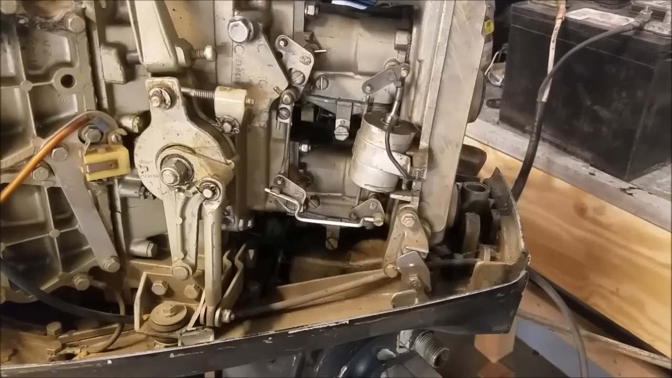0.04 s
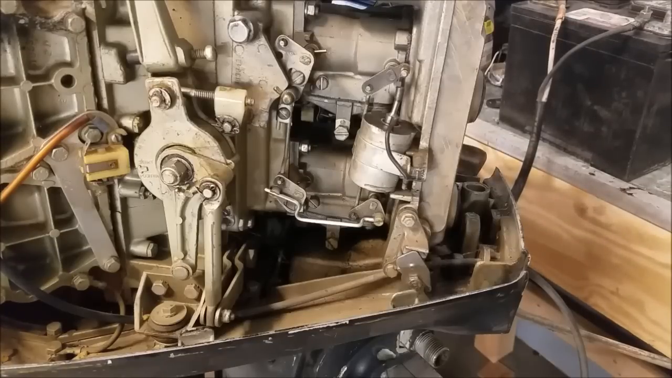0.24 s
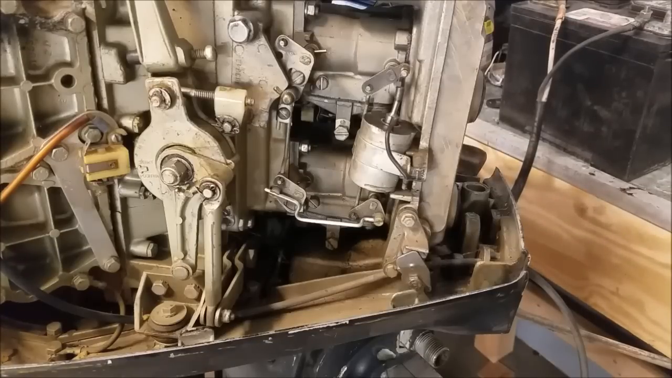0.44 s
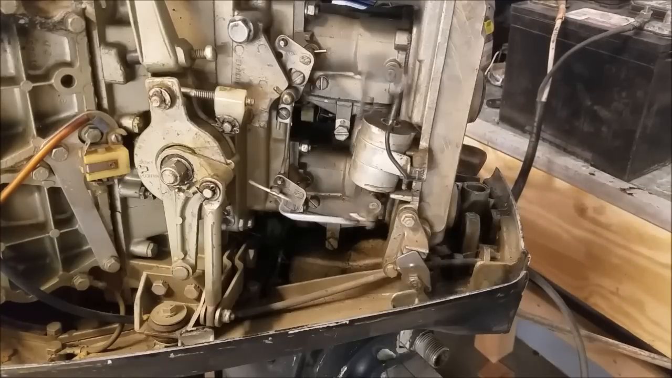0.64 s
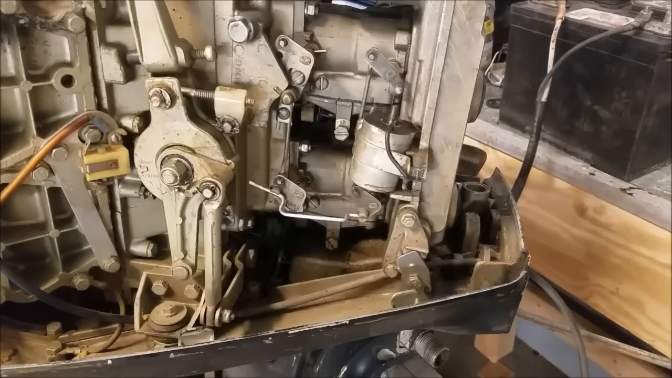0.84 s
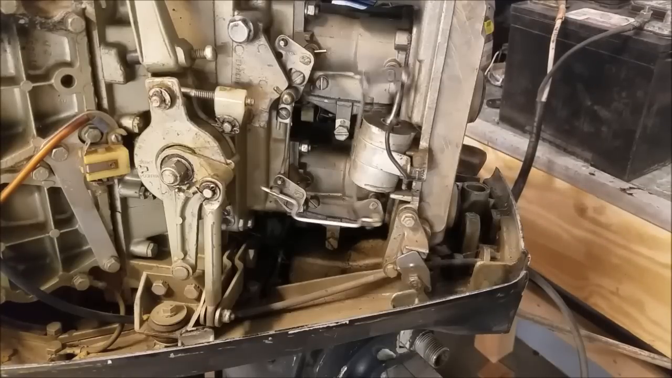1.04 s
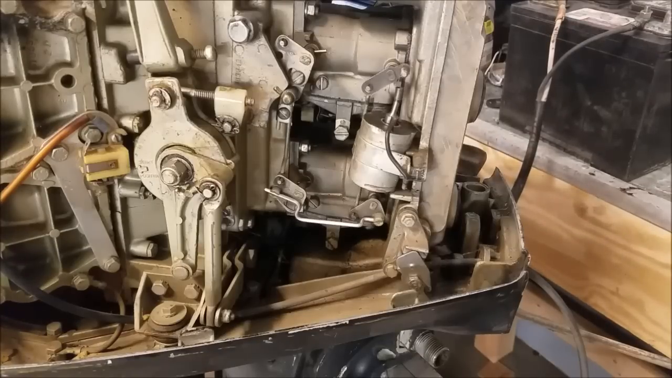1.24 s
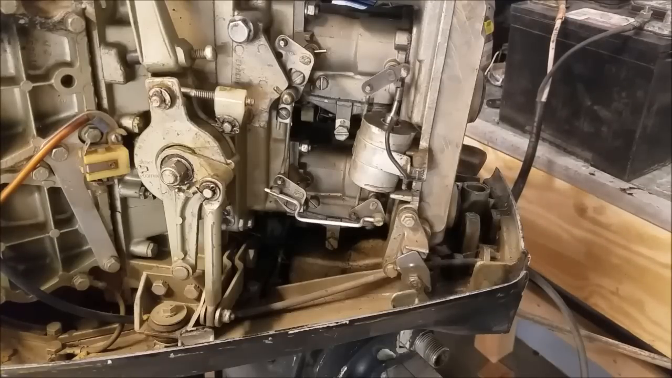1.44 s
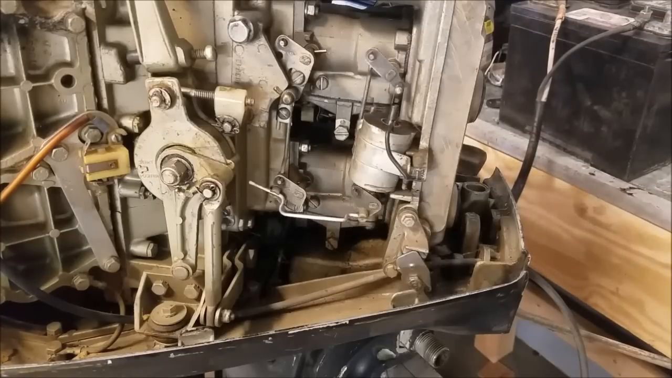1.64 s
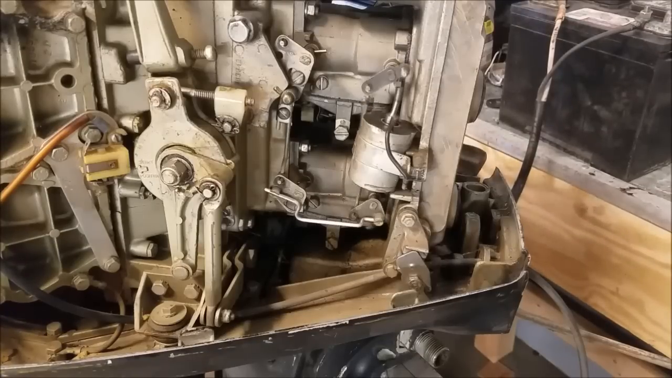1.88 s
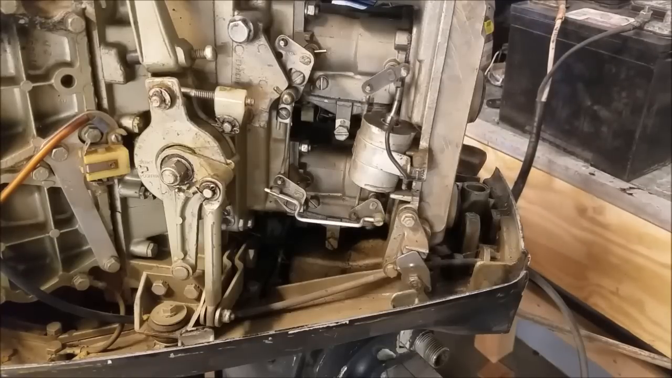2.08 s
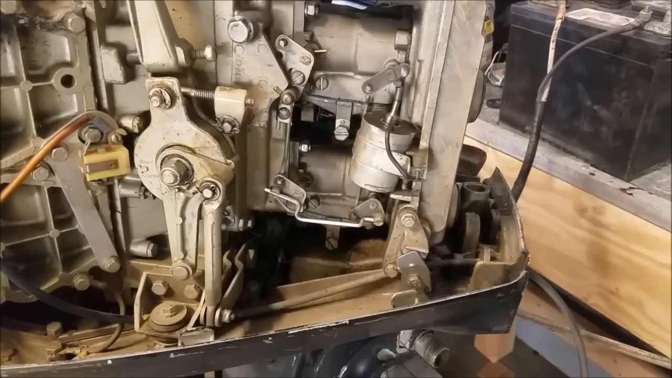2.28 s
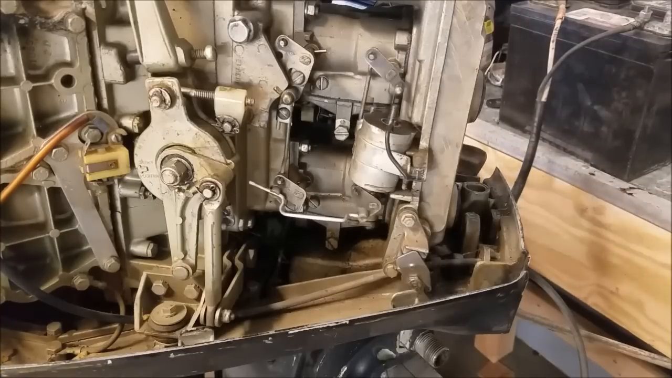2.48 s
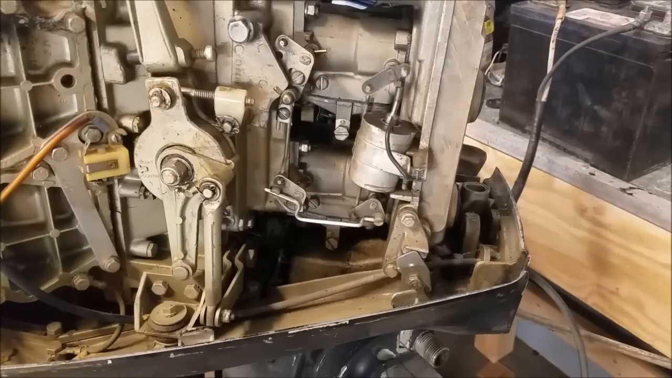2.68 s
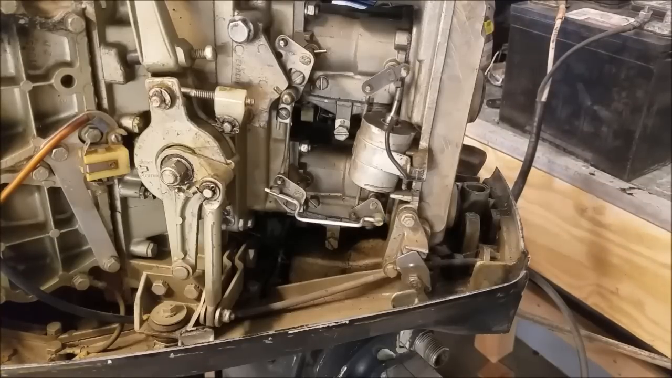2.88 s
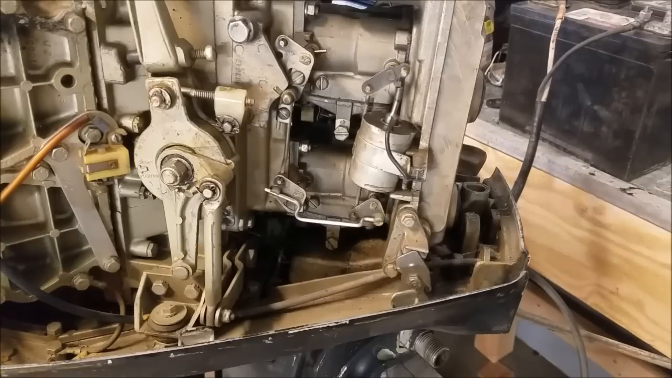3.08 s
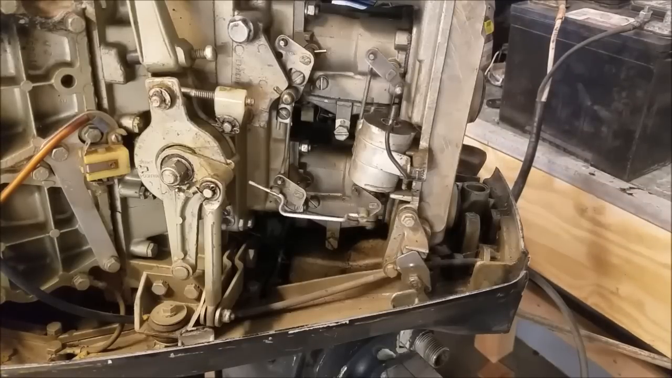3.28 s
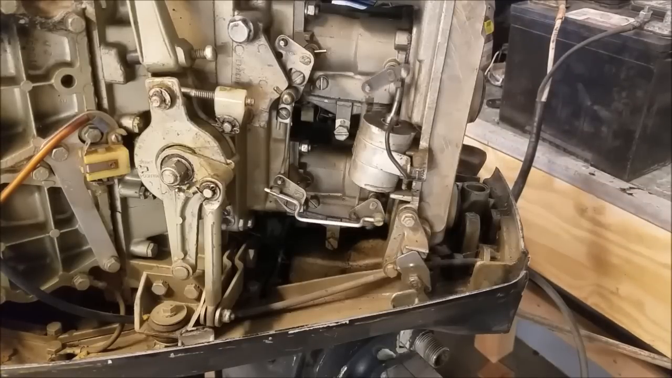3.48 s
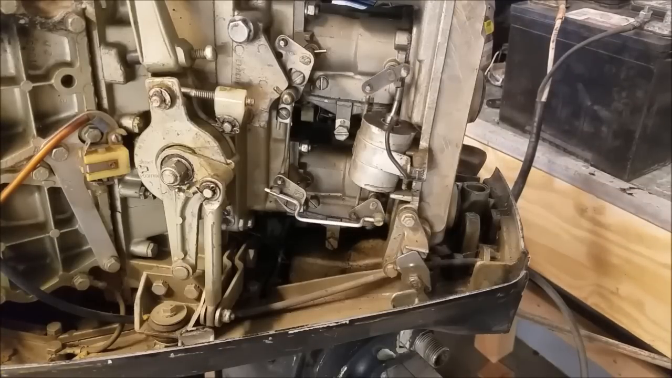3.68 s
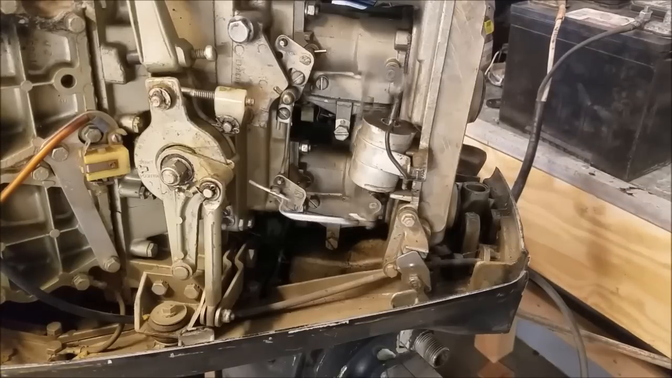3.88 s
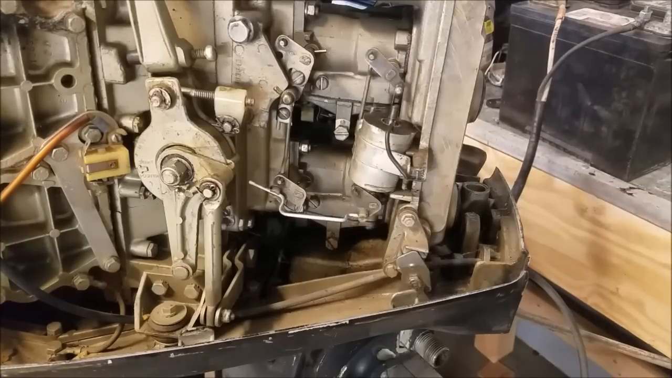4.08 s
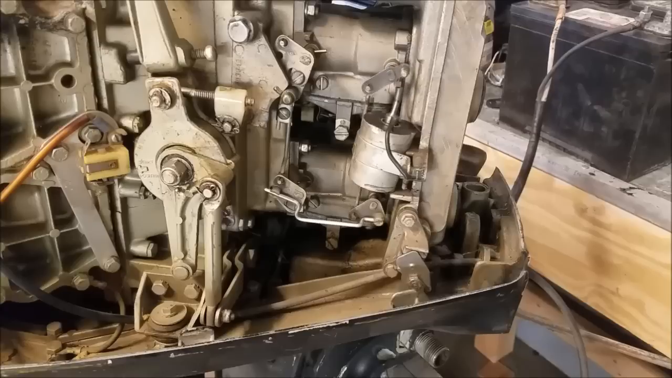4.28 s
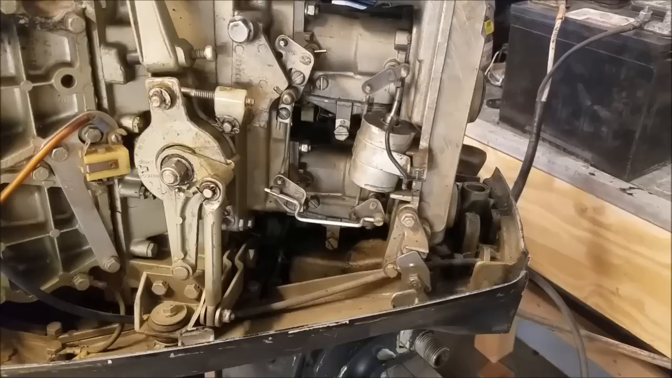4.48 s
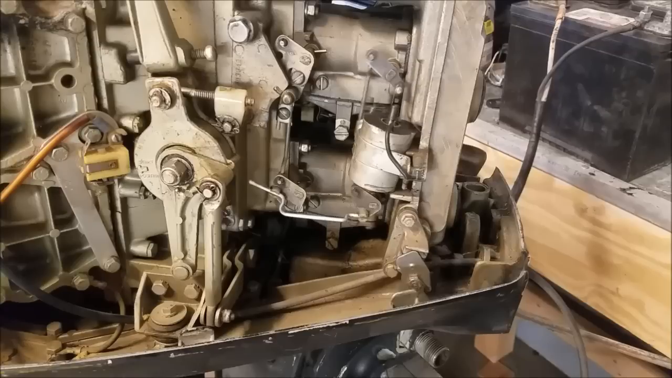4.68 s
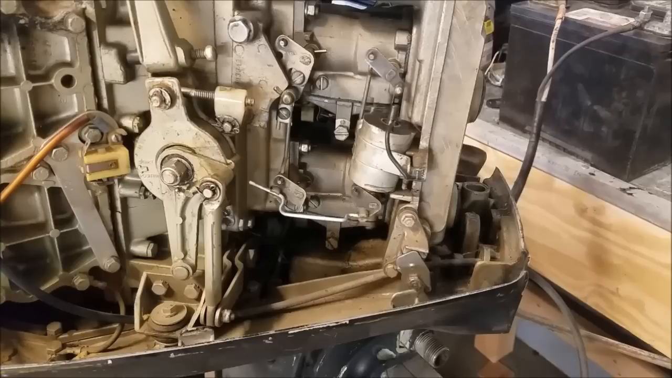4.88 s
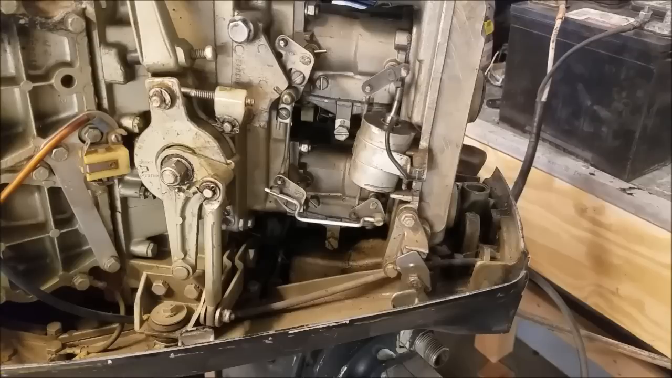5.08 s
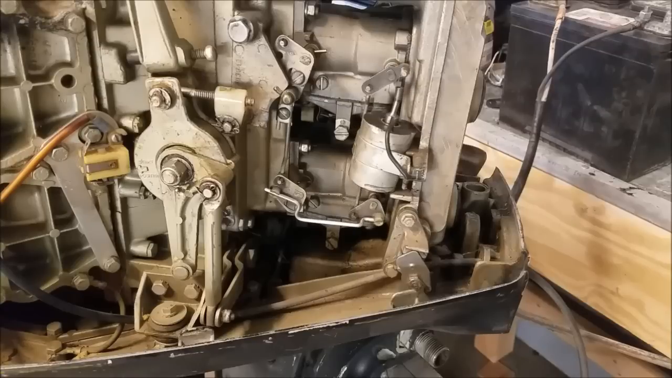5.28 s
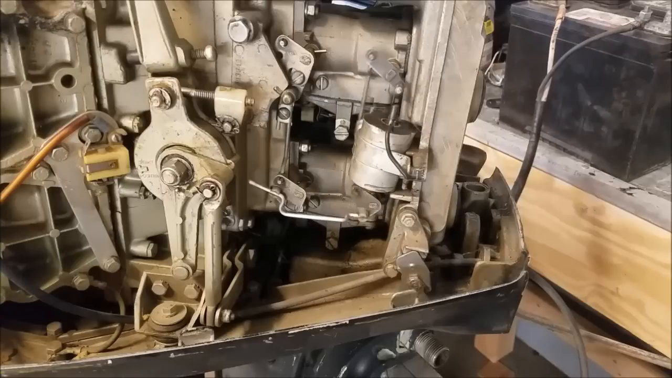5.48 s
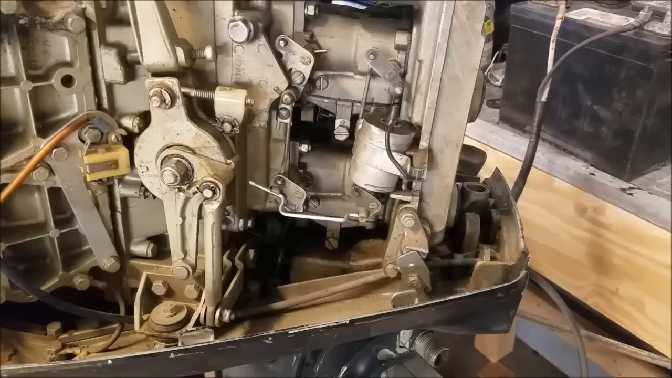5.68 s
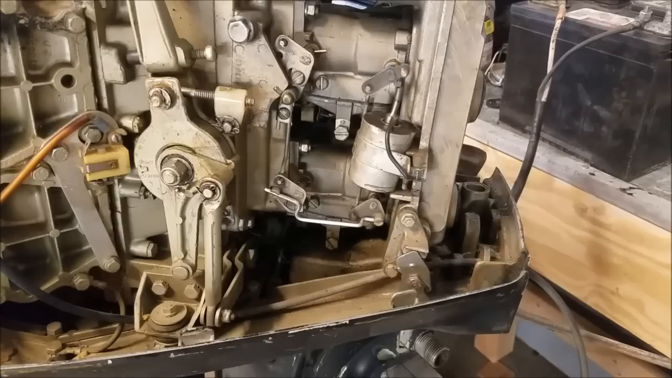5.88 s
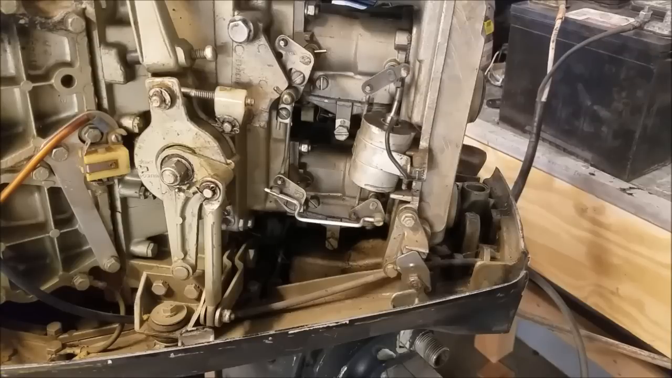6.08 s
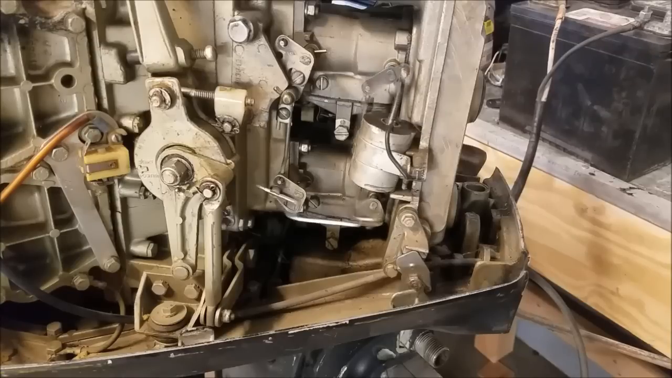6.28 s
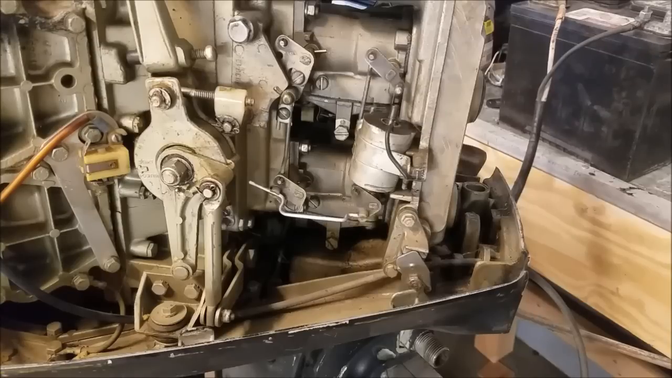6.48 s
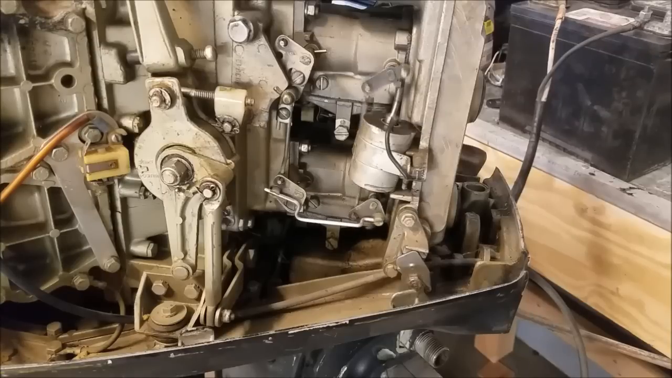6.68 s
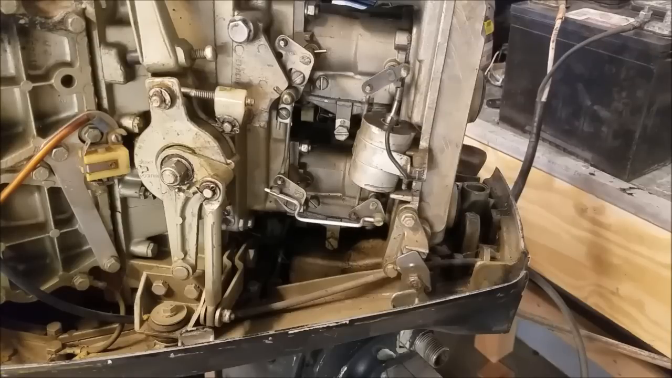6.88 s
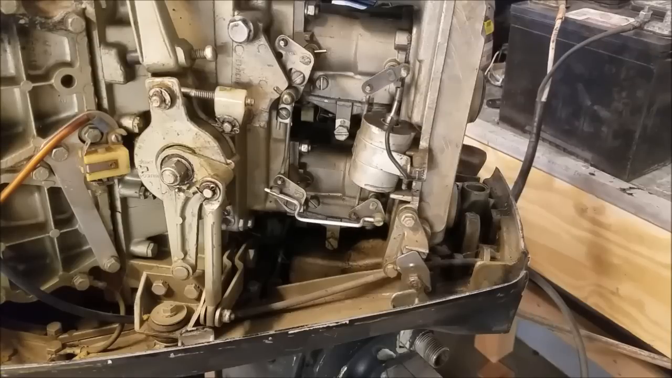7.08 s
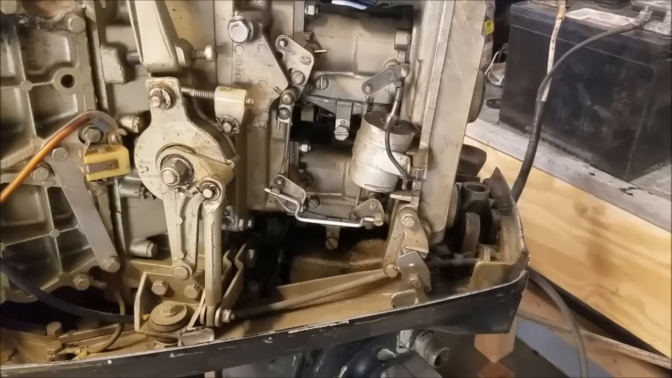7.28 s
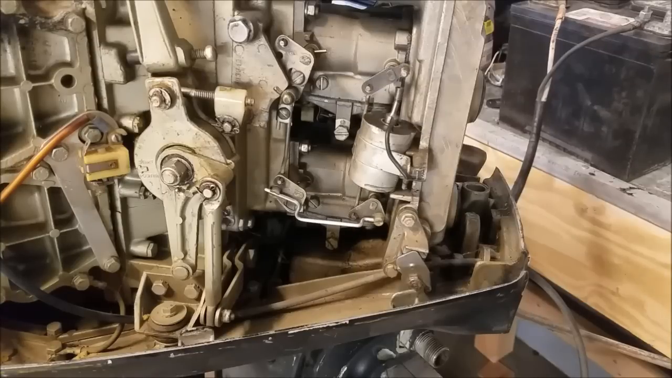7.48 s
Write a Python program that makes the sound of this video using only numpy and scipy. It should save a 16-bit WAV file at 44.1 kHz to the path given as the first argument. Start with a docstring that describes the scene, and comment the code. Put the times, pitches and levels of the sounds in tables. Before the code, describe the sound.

A small solenoid on a boat engine clacks sharply about once a second, with soft spring returns, over a low workshop hum.

```python
"""A low hum fills a small workshop, where the choke solenoid of an outboard motor works nine times.
Each time the plunger slides and clacks in, with a soft early reflection; some 40 ms later the flap slaps
shut. On two strokes the plunger clacks again with the flap already shut. Each impact excites the modes of
the casting and linkage, and the room rings briefly. On release a spring draws the linkage back and a
loose link rattles and settles. Soft scuffs and clicks fall between the strokes; faint rustles come last."""
import sys
import numpy as np
from scipy import signal
from scipy.fft import rfft, irfft, next_fast_len
from scipy.io import wavfile

SR = 44100
rng = np.random.default_rng(int(sys.argv[2]) if len(sys.argv) > 2 else 0)


def put_to_file(sound):
    """Save the sound as 16-bit audio at rate SR, in the file named by the first command-line argument."""
    columns = np.atleast_2d(sound).T  # one column per channel
    safe = np.clip(columns, -1, 1)
    whole_steps = np.round(safe * 32767)
    wavfile.write(sys.argv[1], SR, whole_steps.astype(np.int16))


N = 332514

# Each row: start in seconds, level in dB, ping in dB, flap travel in seconds (0: already shut),
# flap force in dB. A ping is the gain of one narrow ringing band.
PLUNGER_STROKES = [(.7490, -22, 10, 0.045, -0.8), (1.6321, -20, 2, 0.038, 0.96),
                   (2.4280, -22, -4.5, 0.04, 0.1), (2.6212, -21, 6.5, 0.056, -1.5),
                   (2.6611, -19.5, -7, 0, 0), (3.2333, -20.5, -3, 0.04, -1.65), (3.3092, -21.5, 1.5, 0, 0),
                   (3.9901, -21, -2.5, .0409, 0), (4.7403, -20, 2.5, 0.039, 0.32),
                   (5.5492, -20, -5.5, 0.039, .2), (6.4066, -21.5, -1, 0.038, 0.7)]
# Each row: start in seconds, level in dB, ping in dB.
SPRING_RETURNS = [(1.084, -38, -2), (1.862, -37, 1), (2.777, -41, -7), (3.48, -37, 2), (4.261, -38.5, 6.5),
                  (5.033, -37, -1), (5.867, -37, 2.5), (6.694, -37, 5)]
# Soft scuffs, brief bright clicks and a short scrape just before one clack.
# Each row: start in seconds, length in seconds, level in dB, tilt in dB per octave.
SCUFFS_AND_CLICKS = [(1.069, .012, -46, 4), (1.411, .086, -50, 0.6), (1.485, .08, -45.5, 1),
                     (2.154, .12, -52, -1), (2.339, .11, -48.5, 0.5), (2.608, 0.015, -37.5, -0.5),
                     (2.752, .11, -42.5, 1.2), (3.425, 0.018, -51.5, 5.5), (7.267, .1, -52.5, -1.46)]
# Each row: start in seconds, length in seconds, level in dB.
RUSTLE_EVENTS = [(7.111, .09, -62), (7.251, .33, -65)]
# Each row: frequency in Hz, t60 in seconds, relative level in dB when pulled, slapped and returning.
LINKAGE_MODES = [(198.4, 0.11, -32, -16, -32.5), (367, 0.073, -18.5, -17, -60),
                 (462.7, 0.076, -16.5, -31, -33.5), (699, 0.094, -7.5, -14.5, -23),
                 (765, 0.037, -10, -8, -14.5), (968, 0.28, -18.5, -25, -22), (1145, 0.29, -16, -30, -21),
                 (1495, 0.074, -17.5, -6, -4), (1690, .11, -14.5, -14, -15.5),
                 (1750, 0.05, -33, -25, -25.5), (2139, 0.035, -8, -28, -20),
                 (2334, 0.062, -9.5, -24.5, -19.5), (2500, 0.11, -26.5, -17.5, -20),
                 (3022, 0.038, -14.5, -25, -34), (5083, 0.013, -27, -16, -38)]
# Spectra of the sources and the room. Each row: frequency in Hz, relative density in dB.
PULL_SPECTRUM = [(90, -40.5), (270, -24.5), (335, -5.5), (560, -13), (740, 3), (1000, -1.5), (1550, -4),
                 (2300, -5.5), (3100, -6.5), (4100, -23.5), (5800, -18.5), (8300, -36), (10300, -24),
                 (13000, -34.5), (16000, -33.5)]
REFLECTION_SPECTRUM = [(200, -28.5), (350, 2.5), (560, -9.5), (760, 3.5), (1100, -9), (1600, -9),
                       (2300, -5.5), (3200, -6), (5500, -32.5), (8300, -43.5), (15000, -44)]
SLAP_SPECTRUM = [(80, -26), (185, 0.5), (265, -12), (370, 0), (510, -17), (760, -0.5), (1080, -10.5),
                 (1620, 6), (2100, -9.5), (4100, -13.5), (5100, -11), (8300, -25), (10300, -14.5),
                 (13000, -17.5), (16000, -20)]
RETURN_SPECTRUM = [(150, -6), (520, -12), (750, -4.5), (1150, -2), (1430, 7), (2000, -10), (3200, -6),
                   (6500, -19.5), (8300, -28.5), (12000, -16.5), (16000, -23.5)]
TICK_SPECTRUM = [(600, -17), (1350, 0), (1600, -0.5), (1750, 5), (2000, -12), (5000, -28), (14000, -39)]
SCUFF_CLICK_SPECTRUM = [(200, -19.5), (550, -15), (780, -3), (900, -1.5), (1030, -9), (1300, -13.5),
                        (2200, -19.5), (4000, -22), (6300, -23), (8500, -32), (14000, -28)]
RUSTLE_SPECTRUM = [(900, -5.5), (3000, 1.5), (5500, -9.5), (9000, -20.5), (15000, -24)]
REVERB_SPECTRUM = [(100, 3), (400, 2.5), (750, 4.5), (1500, -7), (2500, -1.5), (6000, 0.5), (10000, -3),
                   (15000, -5.5)]
AIR_SPECTRUM = [(22, -7), (45, -10), (65, -4), (100, -6.5), (122, -20), (200, -11), (263, -15.5),
                (347, -13), (420, -18.5), (710, -21.5), (1580, -24.5), (4500, -34.5), (8000, -44),
                (16000, -32)]
# Damping of the casting. Each row: frequency in Hz, t60 in seconds before a contact's decay_scale.
CASTING_T60 = [(200, 0.087), (700, 0.14), (2000, 0.12), (5000, .08), (12000, 0.075)]
# Big panels are slow to move. Each row: frequency in Hz, rise time in seconds before rise_scale.
PANEL_RISE = [(200, 0.00886), (700, 0.0054), (1500, .0006), (5000, 0.00015)]
# Each row: frequency in Hz, reverberation time in seconds.
REVERB_T60 = [(150, 0.6), (700, 0.5), (2500, 0.64), (6000, 0.49), (14000, 0.4)]
# Coherence of the contacts and of the room tone. Each row: frequency in Hz, left-right correlation.
COHERENCE = [(100, 0.882), (300, 0.98), (600, 0.75), (2000, 0.28), (4000, 0.0752), (12000, 0.077)]
AIR_COHERENCE = [(30, 0.33), (100, 1), (400, 0.36), (1500, 0.089), (5000, 0.052)]
# Each row: frequency in Hz, left minus right level in dB.
STEREO_BALANCE = [(200, -2), (1400, -2), (2300, -2.5), (3800, -3.5), (5300, -6), (7400, -9.5), (8600, 4),
                  (10300, 7.5), (13000, 1), (16000, 3.5)]
# Each row: frequency in Hz, nominal width in Hz, level in dB.
HUM_TONES = [(76.9, 13, -65), (102.4, 1.9, -66.5), (150.6, 21, -63.5), (219.9, 3.3, -76)]

TOP_HZ = 16000
RING_TIME = np.arange(SR // 6) / SR
USUAL_TRAVEL_S = .041  # the flap's swing on a healthy stroke


def plunger(reflection_s=.007, reflection_db=-5):
    """Impact and reflection: the plunger clacks in; a softer, diffuse early reflection follows."""
    modes_db = np.transpose(LINKAGE_MODES)[2]
    blows = []
    for start, db, ping_db, travel, _ in PLUNGER_STROKES:
        lag = max(travel / USUAL_TRAVEL_S - 1, 0)
        tilt_db, thud_db = -.22 - 3 * lag, -4 - 10.5 * lag  # a sluggish stroke is duller and thinner
        blows.append((start, db, tilt_db, ping_db, thud_db))
    clacks = impacts(blows, PULL_SPECTRUM, modes_db, ring_db=-2, decay_scale=.77, rise_scale=.91,
                     contact_s=.00041, crack_db=-6.5, crack_t60=.01, crack_hz=2510,
                     ping_hz=2245, fresh=.65)
    delayed = [(start + reflection_s, db + reflection_db, *timbre) for start, db, *timbre in blows]
    reflections = impacts(delayed, REFLECTION_SPECTRUM, modes_db - 5.5, ring_db=-2.5, decay_scale=.63,
                          rise_scale=.67, contact_s=.001, crack_db=-15, crack_t60=.015, crack_hz=2494,
                          ping_hz=2260, fresh=.45)
    return clacks + reflections


def flap_blows():
    """Momentum transfer at the end of the swing: more force is louder, brighter and heavier."""
    return [(start + travel, -23 + force_db, -.77 + .4 * force_db, -.6 + 2.4 * force_db,
             -2 + 1.5 * force_db)
            for start, _, _, travel, force_db in PLUNGER_STROKES if travel > USUAL_TRAVEL_S / 2]


def flap():
    """Impact excitation: the flap hits its stop and sets casting and linkage ringing."""
    modes_db = np.transpose(LINKAGE_MODES)[3]
    return impacts(flap_blows(), SLAP_SPECTRUM, modes_db, ring_db=-3.5, decay_scale=.63, rise_scale=.97,
                   contact_s=.0017, crack_db=-2, crack_t60=.046, crack_hz=695, ping_hz=5080, fresh=.58)


def return_spring(tilt_db=-1.43, thud_db=-.5):
    """Elastic restoring force draws the linkage back; the longer contact gives a soft attack."""
    modes_db = np.transpose(LINKAGE_MODES)[4]
    blows = [(start, db, tilt_db, ping_db, thud_db) for start, db, ping_db in SPRING_RETURNS]
    return impacts(blows, RETURN_SPECTRUM, modes_db, ring_db=-2.5, decay_scale=.34, rise_scale=1,
                   contact_s=.0034, crack_db=-18, crack_t60=.05, crack_hz=2480, ping_hz=1476, fresh=.98)


def impacts(blows, spectrum, modes_db, ring_db, decay_scale, rise_scale, contact_s,
            crack_db, crack_t60, crack_hz, ping_hz, fresh):
    """Superposition: each blow sums a crack of steel on steel, the casting's ring and linkage modes."""
    track, t = np.zeros((2, N)), RING_TIME
    spot = stereo_noise(len(t))
    closing = 1 - np.exp(-(t / contact_s) ** 2)
    for start, db, tilt_db, ping_db, thud_db in blows:
        # Blows on one spot ring alike, except for a fresh share of the energy.
        noise = np.sqrt(1 - fresh) * spot + np.sqrt(fresh) * stereo_noise(len(t))
        ring = closing * dense_modes(noise, spectrum, lambda hz: decay_scale * curve(CASTING_T60, hz),
                                     lambda hz: rise_scale * curve(PANEL_RISE, hz))
        crack = filtered(stereo_noise(len(t)), lambda hz: amp(curve(spectrum, hz)) * hz / (hz + crack_hz))
        crack *= amp(-60 * t / crack_t60) * closing
        blow = amp(ring_db) * ring / np.linalg.norm(ring[0])
        blow += amp(crack_db) * crack / np.linalg.norm(crack[0])
        blow += linkage_ring(modes_db, contact_s)
        blow = filtered(blow, lambda hz: blow_response(hz, tilt_db, ping_db, ping_hz, thud_db))
        add(track, start, amp(db) * np.sqrt(SR / 100) * blow)  # level as if spread over 10 ms
    return track


def blow_response(hz, tilt_db, ping_db, ping_hz, thud_db):
    """Contact hardness tilts the spectrum, in dB per octave; one band and the low thud vary too."""
    octaves = np.log2((hz + 100) / 1500)
    ping = np.exp(-(np.log2((hz + 1) / ping_hz) / .0997) ** 2)
    thud = 1 / (1 + (hz / 330) ** 4)
    return amp(tilt_db * octaves + ping_db * ping + thud_db * thud)


def linkage_ring(levels_db, rise_s, scatter_db=1.42):
    """Free vibration: each mode is a damped sinusoid, excited a little differently by every blow."""
    t, ring = RING_TIME, 0
    for (hz, t60, *_), db in zip(LINKAGE_MODES, levels_db):
        strength, phase, spread = rng.standard_normal(3)
        stereo_phase = np.array([[.5], [-.5]]) * spread * coherence_angle(COHERENCE, hz)
        envelope = amp(-60 * t / t60) * (1 - np.exp(-t / rise_s))
        mode = np.sin(2 * np.pi * (hz * t + phase) + stereo_phase) * envelope
        ring += amp(db + scatter_db * strength) * mode / np.linalg.norm(mode[0])
    return ring


def dense_modes(noise, spectrum, t60, rise_s, count=20):
    """Modal overlap: close modes merge into noise, each band rising and decaying at its own rate."""
    t = np.arange(noise.shape[1]) / SR
    centres = np.geomspace(110, TOP_HZ, count)

    def filter_bank(hz):
        shares = np.array([np.interp(hz, centres, row) for row in np.eye(count)])
        return np.sqrt(shares[:, None]) * (hz > 60)

    hz = centres[:, None, None]
    envelopes = amp(-60 * t / t60(hz)) * (1 - np.exp(-t / rise_s(hz)))
    bands = filtered(noise, filter_bank) * envelopes
    bands /= np.linalg.norm(bands, axis=2, keepdims=True)
    ring = np.sum(bands * amp(curve(spectrum, hz)) * np.sqrt(hz), 0)
    return ring / np.linalg.norm(ring) * np.sqrt(2)


def slides_and_ticks(tick_s=.018):
    """Friction and play: each part slides as it lands, and the loose link ticks after a return."""
    track = np.zeros((2, N))
    for start, db, *_ in PLUNGER_STROKES:
        add(track, start - .012, amp(db - 23.5) * burst(.021, PULL_SPECTRUM, tilt_db=1))
    for start, db, *_ in flap_blows():
        add(track, start - .004, amp(db - 12) * burst(.0076, SLAP_SPECTRUM, tilt_db=6.5))
    for start, db, _ in SPRING_RETURNS:
        add(track, start - .02, amp(db - 10) * burst(.034, RETURN_SPECTRUM, tilt_db=2.5))
        for delay_s, drop_db in (.021, -11), (.131, -18):  # rattling, then settling
            tick = amp(db + drop_db) * burst(tick_s, TICK_SPECTRUM, tilt_db=2.5)
            add(track, start + delay_s - tick_s / 2, tick)
    return track


def small_noises():
    """Duration and spectrum make a noise burst a soft scuff, a bright click, a scrape or a rustle."""
    track = np.zeros((2, N))
    for start, length, db, tilt_db in SCUFFS_AND_CLICKS:
        add(track, start, amp(db) * burst(length, SCUFF_CLICK_SPECTRUM, tilt_db))
    for start, length, db in RUSTLE_EVENTS:
        add(track, start, amp(db) * burst(length, RUSTLE_SPECTRUM, tilt_db=-.5))
    return track


def burst(length_s, spectrum, tilt_db):
    """Amplitude modulation: broadband noise swells and fades under a smooth envelope."""
    size = round(length_s * SR)
    noise = filtered(stereo_noise(size),
                     lambda hz: amp(curve(spectrum, hz) + tilt_db * np.log2(hz / 1000 + .1)))
    return unit_rms(noise) * np.sin(np.linspace(0, np.pi, size)) ** 2


def reverberation(sound, gain_db=-11, rise_s=.0041, count=3):
    """The room's diffuse field builds and decays; its fine pattern drifts from stroke to stroke."""
    wet, knots = 0, np.linspace(0, N, count)
    for row in np.eye(count):
        crossfade = np.sqrt(np.interp(np.arange(N), knots, row))
        tail = dense_modes(stereo_noise(SR * 3 // 5), REVERB_SPECTRUM,
                           lambda hz: curve(REVERB_T60, hz), lambda hz: rise_s)
        wet += signal.oaconvolve(sound * crossfade, tail, axes=1)[:, :N]
    return amp(gain_db) * wet


def room_tone(air_db=-60.5, swell_db=5, peak_s=1.3, period_s=2.62):
    """Broadband noise is heard as rumble and hiss, narrowband noise as hum; the lowest tone swells."""
    air = filtered(stereo_noise(N, AIR_COHERENCE), lambda hz: amp(curve(AIR_SPECTRUM, hz)))
    noise = stereo_noise(N, AIR_COHERENCE)
    drone, *upper = [
        amp(db) * unit_rms(filtered(noise, lambda hz: (1 + ((hz - centre) / width / 2) ** 2) ** -3))
        for centre, width, db in HUM_TONES]
    swell = amp(swell_db * np.cos(2 * np.pi * (np.arange(N) / SR - peak_s) / period_s))
    return (amp(air_db) * unit_rms(air) + swell * drone + sum(upper)) * amp([[-1], [1]])


def stereo_noise(size, coherence=COHERENCE):
    """Partly coherent white noise: the ratio of mid to side sets the channels' correlation."""
    def weights(hz):
        angle = coherence_angle(coherence, hz) / 2
        return np.array([np.cos(angle), np.sin(angle)])

    mid, side = filtered(rng.standard_normal((2, size)), weights)
    return np.array([mid + side, mid - side])


def coherence_angle(coherence, hz):
    """Correlation is the cosine of the angle between two signals."""
    return np.arccos(np.clip(curve(coherence, hz), -1, 1))


def amp(db):
    """Amplitude ratio of a level in dB."""
    return 10 ** (np.asarray(db) / 20)


def unit_rms(x):
    """Normalisation to unit mean power."""
    return x / np.sqrt(np.mean(x ** 2) + 1e-20)


def curve(points, hz):
    """Interpolation on a logarithmic frequency axis."""
    frequencies, values = np.transpose(points)
    return np.interp(np.log(hz + 1), np.log(frequencies + 1), values)


def filtered(x, response):
    """Linear filtering multiplies the spectrum by a frequency response."""
    size = x.shape[-1]
    padded = next_fast_len(size + 1500, real=True)
    return irfft(rfft(x, padded) * response(np.fft.rfftfreq(padded, 1 / SR)), padded)[..., :size]


def add(track, start_s, sound):
    """Superposition of a sound on the track."""
    part = track[:, round(start_s * SR):][:, :sound.shape[1]]
    part += sound[:, :part.shape[1]]


def scene(plunger_send_db=-2):
    """Direct and diffuse sound add; the motor stands a little to the right, its treble spread unevenly."""
    clacks = plunger()
    lighter = flap() + return_spring() + slides_and_ticks() + small_noises()
    room = reverberation(amp(plunger_send_db) * clacks + lighter)
    balance = lambda hz: amp(np.array([[.5], [-.5]]) * curve(STEREO_BALANCE, hz))
    return filtered(clacks + lighter + room, balance) + room_tone()


def record(dry):
    """An ideal low-pass filter removes everything above the band limit."""
    return filtered(dry, lambda hz: hz < TOP_HZ)


dry = scene()
out = record(dry)
put_to_file(out)
```